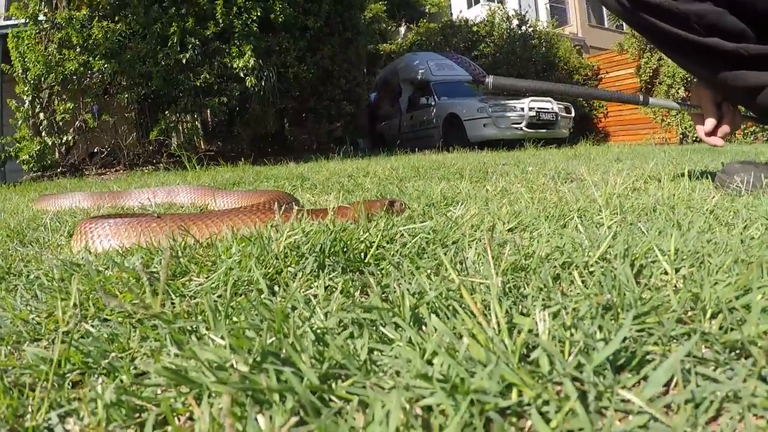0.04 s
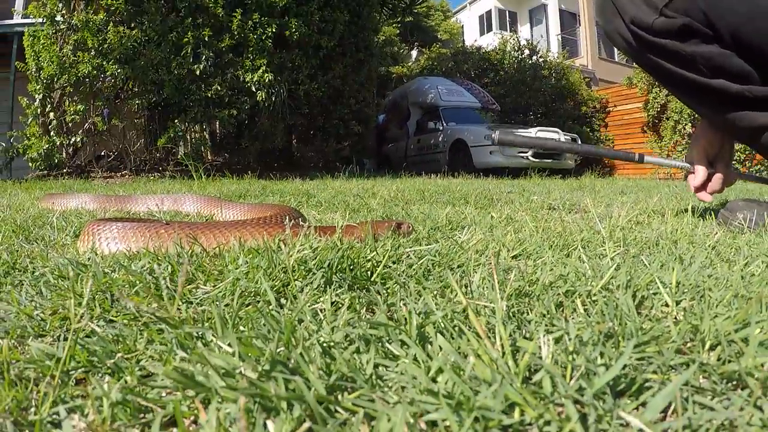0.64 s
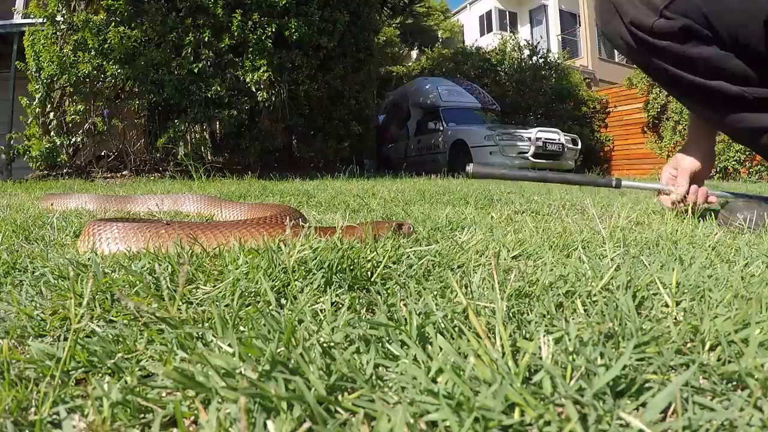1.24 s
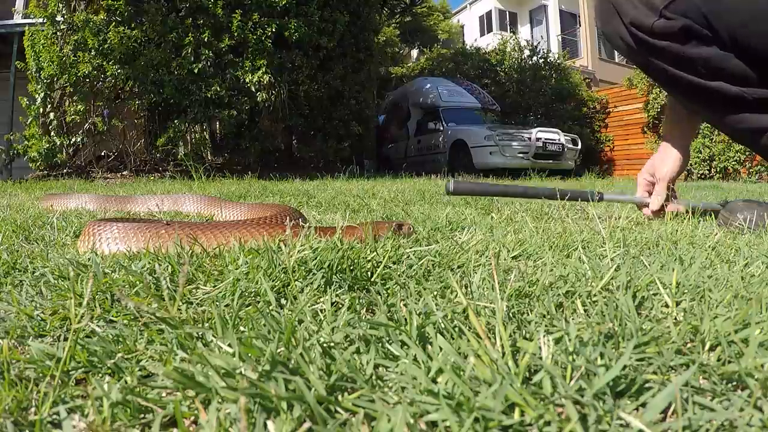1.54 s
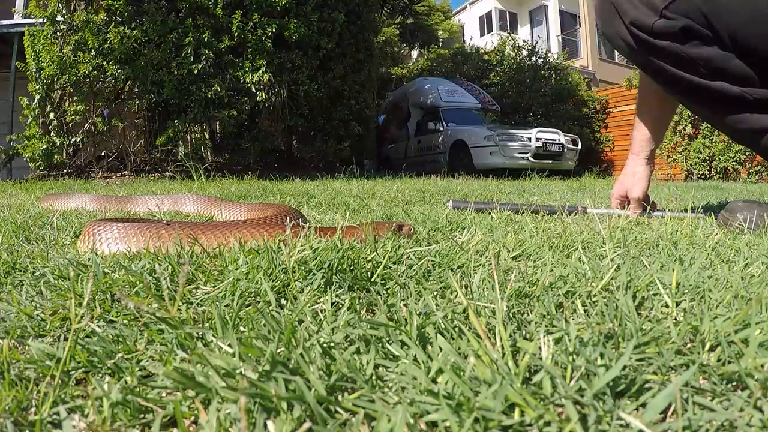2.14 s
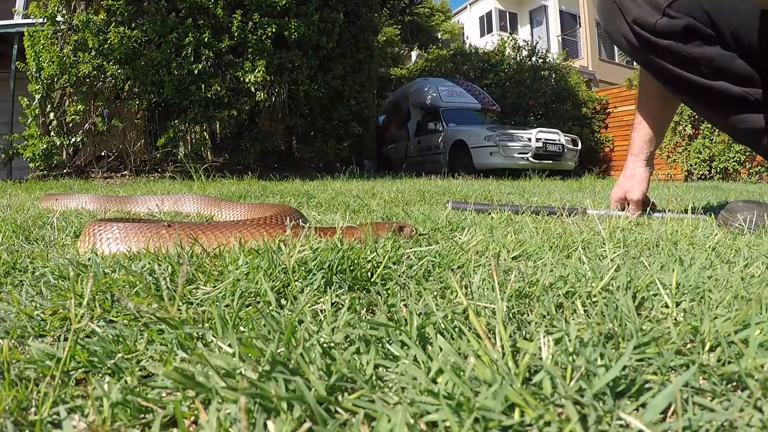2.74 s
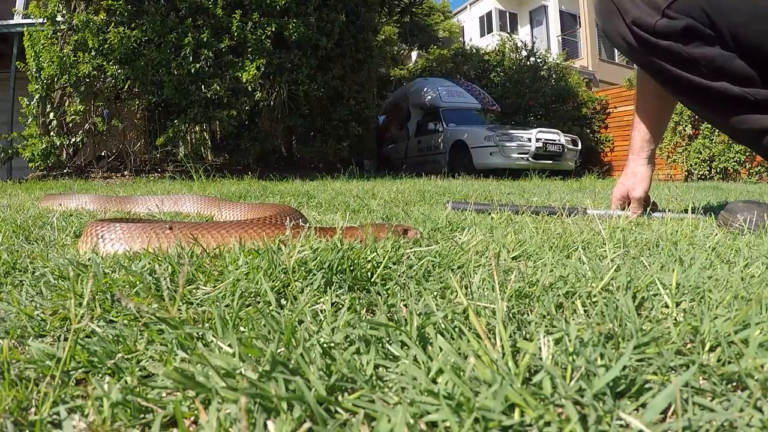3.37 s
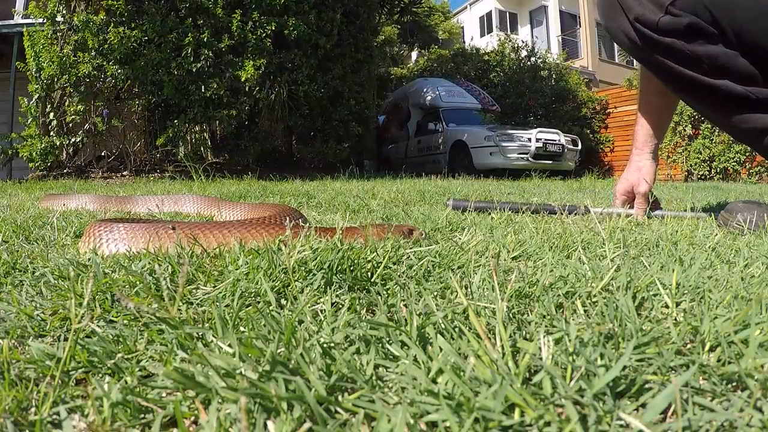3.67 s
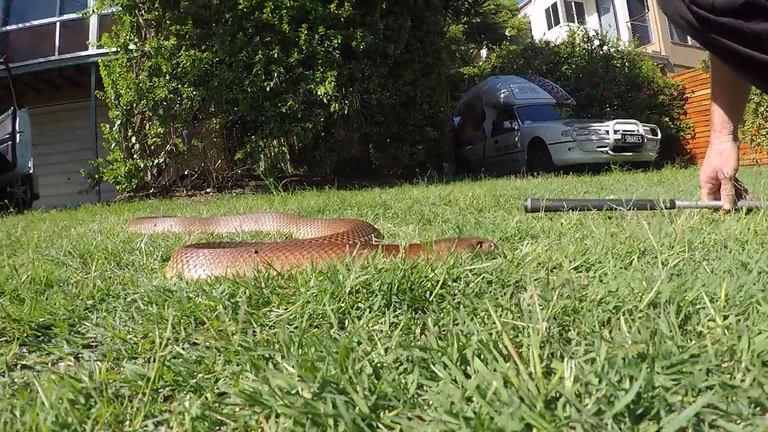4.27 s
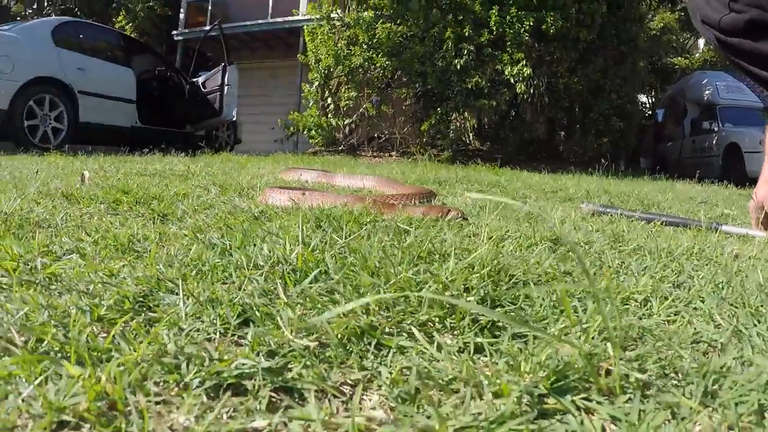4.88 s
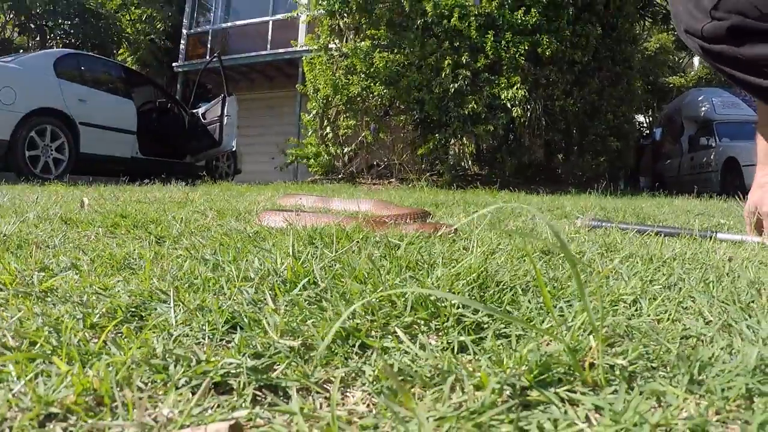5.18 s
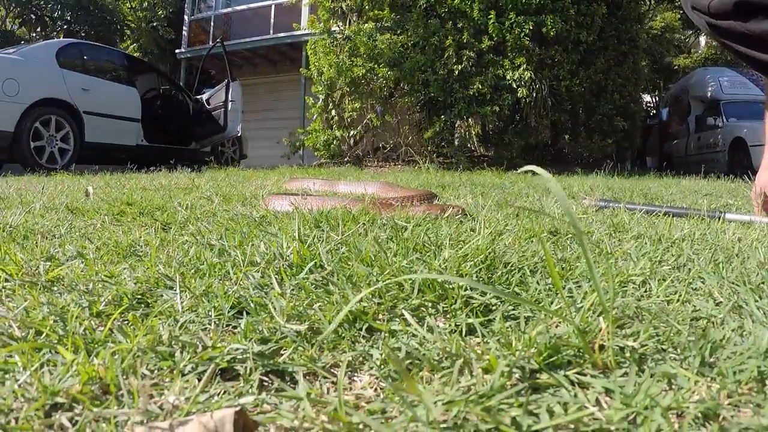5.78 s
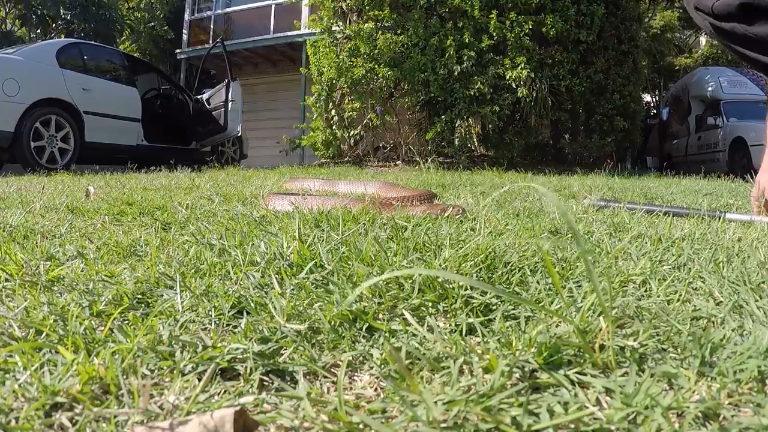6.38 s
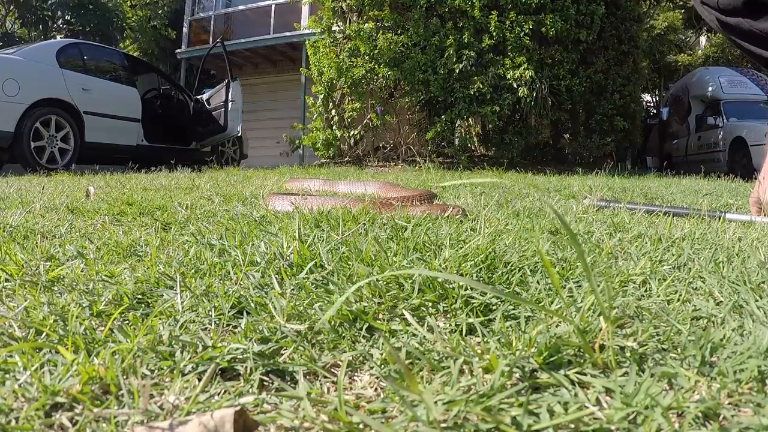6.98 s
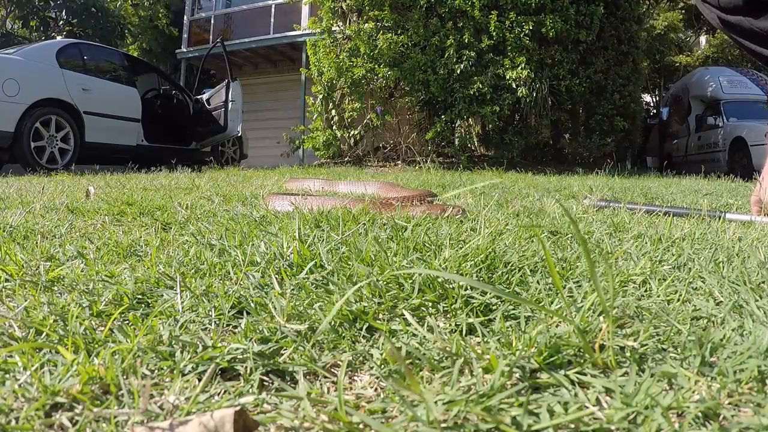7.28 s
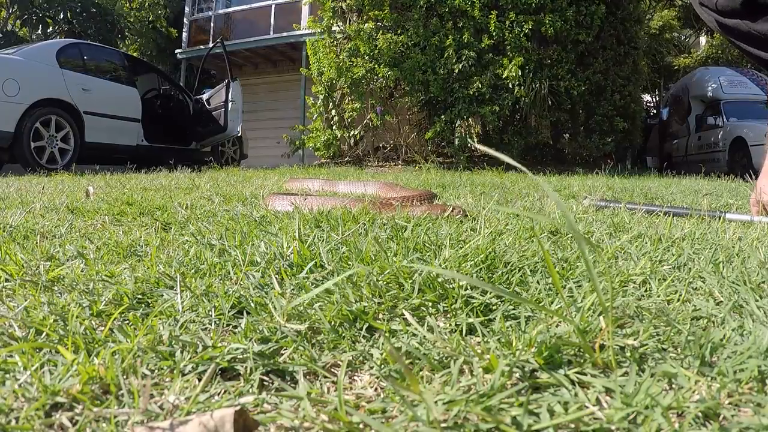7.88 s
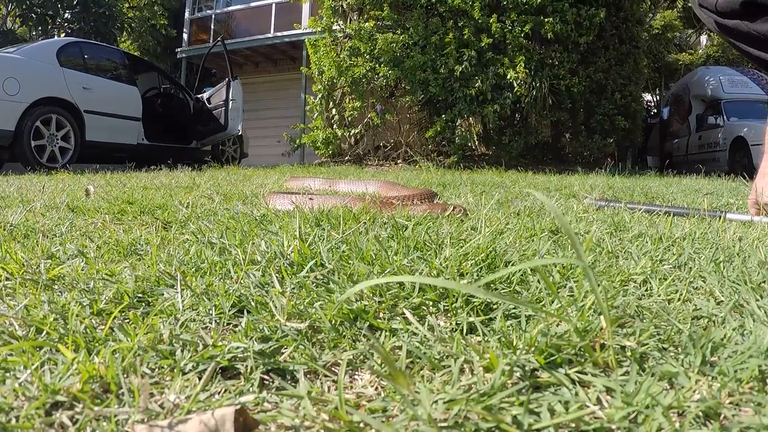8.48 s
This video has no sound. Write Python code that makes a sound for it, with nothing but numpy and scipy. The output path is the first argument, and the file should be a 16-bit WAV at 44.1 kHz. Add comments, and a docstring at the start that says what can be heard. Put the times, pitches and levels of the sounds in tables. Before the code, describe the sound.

For the first half second, fingers rub and slide on a plastic camera case close to the microphone, with a small click. A quiet garden follows: soft hiss, a light low breeze, a distant motor hum, a barely audible high whine and a few faint ticks. A far bird whistles faintly around 3 seconds. At about 3.8 seconds, loud wind hits the microphone with deep rumble and thumps. From 4 to 5.5 seconds, fingers rub, slide and click on the case, some ticks carrying brief metallic pings. The wind roars and thumps hardest around 5.5 seconds, with a faint brush of dry grass, and keeps buffeting until about 7 seconds. After a short lull near 7.5 seconds, strong gusts return from 7.9 seconds to the end at about 8.5, with a few more ticks and light grass brushing.

```python
"""In garden grass, a camera is shifted by hand: fingers rub, slide and tick on its ringing plastic case,
and the ticks carry brief metallic pings. From the moment it is moved, gusts buffet the microphone
with rumble, roar and thumping eddies, and dry blades brush past. Behind it all sit a soft garden hiss,
a distant motor hum, a far bird and a thin, high whine."""
import sys
import numpy as np
from scipy import signal
from scipy.fft import rfft, irfft
from scipy.io import wavfile
from scipy.ndimage import uniform_filter1d, minimum_filter1d

SR = 44100
rng = np.random.default_rng(int(sys.argv[2]) if len(sys.argv) > 2 else 0)


def to_wav(s):
    """Save 16-bit WAV."""
    ch = np.atleast_2d(s).T  # columns
    pcm = np.round(np.clip(ch, -1, 1) * 32767)  # PCM
    wavfile.write(sys.argv[1], SR, pcm.astype(np.int16))


N = 375732
T = np.arange(N) / SR

# Table levels are relative, ahead of each layer's gains. Rise and fall times span 20 dB.
# resonances of the plastic case (frequency [Hz], width [Hz], level [dB])
CASE_MODES = [(341, 65, -12.5), (508, 89, -2.5), (619, 43, 0.5), (700, 63, -2.5), (774.6, 22, 2.5),
              (1010, 910, -15.5), (1275, 97, -6), (1425, 32, -15), (1844, 290, -13.5), (2033, 103, -4),
              (2680, 250, -16.5), (2944, 140, -10.5), (3190, 450, -13), (3440, 65, -11), (3860, 600, -14),
              (4940, 340, -14), (5540, 390, -19), (6300, 420, -20), (7940, 1100, -31.5), (10700, 1800, -38),
              (13500, 1800, -45)]
# rough finger rubs (time at full force [s], hold [s], rise [s], fall [s], level [dB])
FINGER_RUBS = [(0, 0.11, .02, .05, -40), (.125, 0.1, .04, 0.044, -37.5),
               (.28, 0.0069, 0.0087, 0.067, -44.5), (4.085, .043, 0.04, .02, -37.5),
               (4.225, 0.13, .11, 0.1, -33), (4.44, 0.04, 0.024, 0.068, -36.5),
               (4.52, 0.036, .02, 0.027, -48), (4.6, 0.039, 0.023, 0.12, -48),
               (4.703, .022, 0.023, 0.04, -39.5), (4.762, 0.012, 0.019, 0.076, -32.5),
               (4.862, 0.0076, 0.013, 0.061, -34), (5.02, 0.03, 0.13, 0.1, -22.5),
               (5.32, 0.028, .07, 0.046, -33)]
# smooth slides (time at full speed [s], hold [s], rise [s], fall [s], level [dB], sheen lift [dB])
FINGER_SLIDES = [(0, 0.02, .01, 0.06, -32, -2), (0.089, 0.057, .025, 0.019, -33, -1),
                 (4.036, 0.043, .002, 0.043, -31.5, 8), (4.177, 0.043, 0.057, 0.26, -32.5, 1),
                 (5.198, 0.04, 0.031, 0.082, -37.5, -3), (5.255, 0.018, 0.069, 0.06, -39, 7),
                 (5.29, 0.012, .05, 0.031, -31, -7)]
# tone of a slide (frequency [Hz], level [dB])
SLIDE_EQ = [(300, -5), (550, 6.5), (1000, -9.5), (1500, -11), (2000, -6.5), (2350, -13), (2900, -6.5),
            (4000, -5.5), (5500, -9), (6200, -16.5), (7200, -16.5), (8400, -23.5), (12500, -32),
            (15000, -31)]
# snaps and ticks (time [s], level [dB], click and ping lift [dB], click and ping pitch [Hz])
TICK_HITS = [(.195, -35, -2, 3400), (.547, -47, -17, 2780), (.74, -51, -13, 2900), (.893, -48, -8, 3900),
             (.954, -54, -15, 3300), (1.234, -48.5, 0, 4100), (1.46, -53, -6, 4410),
             (2.507, -47.5, -6.5, 3050), (4.077, -40, 7, 4730), (4.088, -27, -8.5, 3730),
             (4.124, -24.5, -12, 3810), (4.258, -36, 4.5, 2880), (4.357, -25, -10, 2840),
             (4.435, -36, 7.5, 2830), (4.465, -39, -2.5, 2970), (4.482, -22, -4, 4610),
             (4.543, -32, -18, 3440), (4.575, -40, -9, 3790), (4.595, -31, -21, 2960),
             (4.699, -33.5, -12, 3620), (4.72, -33.5, -8, 3060), (4.823, -30.5, -10, 2650),
             (4.858, -34, -5, 2850), (4.927, -43.5, 10, 3780), (5.245, -29, -13, 5400),
             (5.421, -40.5, -4.5, 3120), (6.026, -45, -14, 2800), (6.347, -48.5, 6, 3060),
             (7.532, -38.5, -25, 2860), (7.988, -51, 5.5, 2680), (8.023, -40.5, -10, 3320),
             (8.331, -38.5, -2.5, 3020), (8.399, -50, -1, 3100)]
# airflow between gusts: light breeze, windy spell, lull, wind again (time [s], level [dB])
AIRFLOW = [(0, -39.5), (2.3, -40), (3.0, -43), (3.55, -43), (3.78, -15.5), (4.15, -23), (4.7, -20.5),
           (5.45, -21), (5.72, -20), (6.2, -17.5), (6.5, -20.5), (7.0, -22.5), (7.4, -36.5), (7.55, -49),
           (7.72, -35.5), (7.88, -16.5), (8.52, -18.5)]
# gusts swelling over that flow (peak time [s], length [s], level [dB])
GUST_SWELLS = [(0.194, 0.086, -35.5), (0.738, 0.065, -29), (1.028, 0.098, -32.5), (1.955, 0.084, -30.5),
               (2.097, 0.097, -28), (2.413, 0.17, -32.5), (2.591, 0.068, -28), (2.833, 0.039, -34),
               (3.898, 0.027, -7.5), (4.349, 0.089, -16), (4.557, 0.045, -13), (4.775, 0.053, -13),
               (4.903, 0.052, -11), (5.01, 0.11, -15), (5.37, 0.065, -12), (5.477, 0.086, -10),
               (6.056, 0.059, -24), (6.181, 0.052, -8), (6.388, 0.037, -13), (6.595, 0.11, -18),
               (6.79, 0.059, -21), (6.945, 0.036, -19), (7.09, .05, -26.5), (7.766, 0.089, -28),
               (8.002, 0.021, -11), (8.192, 0.051, -12.5), (8.267, 0.072, -10.5), (8.414, 0.05, -11)]
# spells of fast turbulence (time at full speed [s], hold [s], rise [s], fall [s], level [dB])
TURBULENCE = [(3.77, .06, 0.16, .05, -52), (3.87, 0.077, 0.026, .08, -26), (3.955, 0.014, 0.055, .17, -21),
              (5.35, .1, 0.02, 0.11, -29), (5.53, .14, 0.21, 1.0, -20.5), (5.89, 0.12, .2, 0.05, -26.5),
              (6.16, 0.1, 0.022, 0.09, -22.5), (6.38, .33, .05, 0.091, -35.5), (7.08, .01, .03, 0.23, -49),
              (7.922, 0.019, 0.057, 0.21, -23), (8.12, 0.18, 0.3, .1, -33),
              (8.303, 0.0061, 0.048, 0.19, -18.5), (8.42, .008, 0.046, 0.29, -25)]
# eddies landing on the microphone (time [s], thump level [dB], roar burst level [dB])
EDDIES = [(3.851, -17, -21), (3.931, -0.5, -16.5), (4.336, -8, -40), (4.522, -6, -39), (4.771, -15, -19),
          (5.399, -3, -32), (5.464, 1, -9), (5.5, -1, -9), (5.525, -1, -17), (5.609, -26, -12),
          (6.209, -7, -21), (6.275, -18, -19.5), (6.369, -4, -18.5), (6.715, -8.5, -22.5), (7.06, -2, -44),
          (7.622, -12, -33), (7.774, -6, -38), (7.916, -1.5, -12), (7.984, -3, -9.5), (8.247, -12, -20),
          (8.295, -23, -9.5), (8.417, -20, -9)]
# tone of the four wind layers, darkest first (frequency [Hz], level [dB])
RUMBLE_EQ = [(8, -17), (20, 2), (31, 3), (55, -5), (85, -7.5), (130, -21), (300, -89), (700, -82.5)]
BUFFET_EQ = [(40, -2.5), (90, 1.5), (130, 0.5), (200, -4), (280, -11.5), (450, -22), (900, -47.5),
             (2000, -108)]
ROAR_EQ = [(120, 0.5), (280, 3), (400, 0.5), (520, -2.5), (700, -18.5), (1000, -45.5), (1600, -46),
           (3000, -47), (6000, -76), (15000, -66)]
SPUTTER_EQ = [(400, 7), (800, 14), (1300, 2), (2000, -7), (4000, -19.5), (7000, -31), (15000, -47)]
# blades brushing past (time at full level [s], hold [s], rise [s], fall [s], level [dB])
GRASS_BRUSHES = [(3.155, .02, .03, .12, -63), (5.46, 0.055, 0.045, 0.21, -55.5),
                 (7.925, 0.11, 0.045, 0.042, -55.5), (8.25, 0.12, .1, 0.052, -60),
                 (8.415, 0.011, 0.023, 0.069, -54)]
# tone of dry grass (frequency [Hz], level [dB])
GRASS_EQ = [(1200, -8), (2800, -1), (5000, -1), (7500, -6), (15000, -13)]
# tone of the low outdoor wash (frequency [Hz], level [dB])
WASH_EQ = [(29, -25), (50, -1.5), (124, -6.5), (299, -13), (506, -16), (724, -28.5), (1200, -36.5),
           (2070, -45), (2820, -57.5), (4340, -40.5), (7160, -49), (8870, -58.5), (9530, -54.5),
           (12700, -56.5), (15000, -61.5)]
# fader ride on the far hiss of foliage and insects (time [s], level [dB])
FOLIAGE_RIDE = [(0, -63), (5.8, -63), (6.3, -58.5), (6.8, -57), (7.5, -59.5), (8.5, -59)]
# tone of that hiss (frequency [Hz], level [dB])
FOLIAGE_EQ = [(1200, -7), (2200, 1.5), (2800, 7), (3400, 3.5), (4000, 4.5), (5500, -2.5), (7500, -8.5),
              (15000, -14.5)]
# harmonics of the distant motor (frequency [Hz], level [dB])
MOTOR_HARMONICS = [(126.3, -49), (189.5, -59), (253.3, -57.5), (379, -64), (505, -64.5)]
# the far bird's phrase (time [s], length [s], start pitch [Hz], end pitch [Hz], level [dB])
BIRD_NOTES = [(2.883, .04, 4120, 4230, -62), (2.91, 0.032, 4620, 4760, -64), (2.99, .03, 2840, 2810, -64),
              (3.035, .05, 2780, 2490, -64), (3.11, .055, 2830, 3100, -64)]


def case_ring(leak_db=-33, leak_hz=3500, size=4096):
    """Impulse response of the plastic case: its modes over a weak direct path."""
    hz = abs(np.fft.fftfreq(size, 1 / SR))
    modes = sum((amp(db) / (1 + (2 * (hz - f) / width) ** 2)) ** 2 for f, width, db in CASE_MODES)
    leak = amp(leak_db) ** 2 / (1 + (hz / leak_hz) ** 4)
    log_gain = np.log(modes + leak) / 2
    return np.fft.ifft(np.exp(np.conj(signal.hilbert(log_gain)))).real  # minimum phase: no pre-ring


def rubs(ring, body_db=2, treble_db=-10, grit_db=-7, firm_db=-35, catch_db=3, grip_db=1.35):
    """Skin catches and slips, and each tiny slip rings the case. A firmer rub is louder and duller."""
    slips = grains(per_s=4000, spread_db=0) * amp(catch_db * wander(150))
    hard_catches = grains(per_s=160, spread_db=1)
    scrape = steady(signal.oaconvolve(slips, ring)[:N], seconds=0.0087)
    scrape += amp(grit_db) * unit(signal.oaconvolve(hard_catches, ring)[:N])
    top = highs(scrape, hz=4300)
    force = strokes(FINGER_RUBS) * amp(grip_db * wander(60) - firm_db)  # 1 for a firm rub
    body = amp(body_db) * unit(scrape - top) * force
    treble = amp(treble_db) * unit(top) * force ** 0.79
    return amp(firm_db) * (body + treble)


def slides(flutter_db=1.0, sheen_hz=6300):
    """Light slides make grains so fine they merge into hiss; each has its own amount of bright sheen."""
    hiss = colour(grains(per_s=12000, spread_db=3), SLIDE_EQ) * amp(flutter_db * wander(120))
    sheen = highs(hiss, sheen_hz)
    speed = strokes([(*timing, db) for *timing, db, _ in FINGER_SLIDES])
    sheen_gain = strokes([(*timing, db + lift_db) for *timing, db, lift_db in FINGER_SLIDES])
    return (hiss - sheen) * speed + sheen * sheen_gain


def ticks(ring, knock_db=22, click_db=24, ping_db=20, focus_db=12, scuff_t60=0.022, ping_t60=0.059):
    """Snaps and ticks: a low knock and bright click on the case, plus a brief metallic ping."""
    out, t = np.zeros(N), np.arange(len(ring)) / SR
    hz = np.fft.rfftfreq(len(t), 1 / SR) + 1
    low_band = 1 / (1 + (hz / 2450) ** 8)  # crossover between knock and click
    for s, db, bright_db, pitch_hz in TICK_HITS:
        scuff = 0.21 * rng.standard_normal(len(t)) * amp(-60 * t / scuff_t60)
        snap = np.roll(scuff + (t == 0), 32)  # a short lead-in leaves room for the filters
        spectrum = rfft(snap) * rfft(ring)
        off_pitch = np.minimum((2 * np.log2(hz / pitch_hz)) ** 2, 1)
        focus = amp(-focus_db * off_pitch) * np.sqrt(hz / pitch_hz)
        knock = irfft(spectrum * low_band)
        click = irfft(spectrum * (1 - low_band) * focus)
        ping = np.sin(2 * np.pi * pitch_hz * t) * amp(-60 * t / ping_t60)
        add(out, s, amp(db + bright_db + ping_db) * ping / np.linalg.norm(ping))
        add(out, s, amp(db + knock_db) * knock / np.linalg.norm(knock))
        add(out, s, amp(db + bright_db + click_db) * click / np.linalg.norm(click))
    return out


def wind(rumble_db=0.5, buffet_db=-28, churn_db=-4, roar_db=0.5, sputter_db=-44,
         gust_ref_db=-17, speed_ref_db=-22, burst_db=-3, burst_rise_s=0.0029, burst_t60=0.07):
    """Air rumbles, buffets and, at speed, roars and sputters; a faint distortion hiss is laid on top."""
    lumps = steady(amp(2 * wander(90)), seconds=0.023)
    flutter = amp(1.5 * wander(30))
    push = wind_pressure()
    speed = strokes(TURBULENCE) * flutter
    rumble = amp(rumble_db) * steady(noise(RUMBLE_EQ), seconds=0.09) * push
    shake = amp(buffet_db) * (push * flutter / amp(gust_ref_db)) ** 1.36
    buffet = steady(noise(BUFFET_EQ) * lumps, seconds=0.039) * np.hypot(shake, amp(churn_db) * speed)
    t = np.arange(SR // 4) / SR
    for s, _, db in EDDIES:  # the air speeds up abruptly as an eddy lands
        add(speed, s, amp(db + burst_db - 60 * t / burst_t60) * np.minimum(t / burst_rise_s, 1))
    roar = amp(roar_db) * steady(noise(ROAR_EQ) * lumps, seconds=0.021) * speed
    crackle = colour(grains(per_s=1500, spread_db=0), SPUTTER_EQ)
    sputter = amp(sputter_db) * crackle * (speed * lumps / amp(speed_ref_db)) ** 1.83
    return rumble + buffet + roar + sputter + distortion_hiss(rumble + buffet)


def wind_pressure():
    """Strength of the wind: bell-shaped gusts over the underlying flow."""
    gust_power = sum(amp(db) ** 2 * np.exp(-(2 * (T - s) / length) ** 2) for s, length, db in GUST_SWELLS)
    return np.sqrt(ride(AIRFLOW) ** 2 + gust_power)


def distortion_hiss(lows, relative_db=-52):
    """Faint distortion hiss that swells with the loudest low rumbles."""
    return amp(relative_db) * rng.standard_normal(N) * abs(lows)


def thumps(gain_db=-5.5, eddy_hz=54, cycles=0.98, churn=0.43):
    """Each eddy is a push and a pull of pressure with a little churning behind it."""
    out, t = np.zeros(N), np.arange(SR // 8) / SR
    age = t * eddy_hz / cycles
    lowpass = signal.butter(3, 2 * eddy_hz, fs=SR, output="sos")
    for s, db, _ in EDDIES:
        swirl = unit(signal.sosfilt(lowpass, rng.standard_normal(len(t))))
        eddy = age * np.exp(-2 * age) * (np.sin(2 * np.pi * eddy_hz * t) + churn * swirl)
        add(out, s, amp(db + gain_db) * eddy / abs(eddy).max())
    return out


def grass():
    """Dry blades catch on each other in tiny snaps."""
    return colour(grains(per_s=1800, spread_db=4.5), GRASS_EQ) * strokes(GRASS_BRUSHES)


def garden(wash_db=-45.5):
    """The ambience bed: a low outdoor wash under the far hiss of foliage and insects."""
    return amp(wash_db) * noise(WASH_EQ) + noise(FOLIAGE_EQ) * ride(FOLIAGE_RIDE)


def motor(waver_rad=0.15):
    """A distant motor hums, each harmonic wavering slightly in phase."""
    return sum(amp(db) * np.sqrt(2) * np.sin(2 * np.pi * hz * T + waver_rad * wander(8.2))
               for hz, db in MOTOR_HARMONICS)


def bird(gain_db=-1, flicker_db=7):
    """A far bird's gliding whistles flicker on their way through the air."""
    out = np.zeros(N)
    for s, length, start_hz, end_hz, db in BIRD_NOTES:
        progress = np.arange(0, length, 1 / SR) / length
        turns = np.cumsum(start_hz + (end_hz - start_hz) * progress) / SR
        add(out, s, amp(db) * np.sin(np.pi * progress) * np.sin(2 * np.pi * turns))
    return out * amp(gain_db + flicker_db * wander(70))


def whine(db=-78, pitch_hz=8631, throb_hz=29.5):
    """A thin, high whine that throbs evenly."""
    return amp(db) * (1 + np.cos(2 * np.pi * throb_hz * T)) * np.sin(2 * np.pi * pitch_hz * T)


def amp(db):
    """Decibels to gain."""
    return 10 ** (np.asarray(db) / 20)


def unit(x):
    """Scales to rms 1."""
    return x / np.sqrt(np.mean(x ** 2) + 1e-20)


def colour(x, eq):
    """Shapes x with an EQ curve of (frequency [Hz], level [dB]) points; rms 1."""
    f, db = np.transpose(eq)
    hz = np.fft.rfftfreq(N, 1 / SR)
    gain = amp(np.interp(np.log(hz + 1), np.log(f), db))
    return unit(irfft(rfft(x) * gain, N))


def noise(eq):
    """White noise through an EQ curve."""
    return colour(rng.standard_normal(N), eq)


def highs(x, hz):
    """The part of x above hz."""
    return signal.sosfiltfilt(signal.butter(3, hz, "high", fs=SR, output="sos"), x)


def grains(per_s, spread_db):
    """Random clicks of uneven size."""
    sizes = rng.standard_normal(N) * amp(spread_db * np.minimum(rng.exponential(1, N), 4))
    return unit(sizes * (rng.random(N) < per_s / SR))


def wander(per_s):
    """Random modulator of rms 1, gliding to per_s new values a second."""
    return unit(np.interp(T * per_s, np.arange(N // 16), rng.standard_normal(N // 16)))


def steady(x, seconds):
    """Levels out swells slower than the given time."""
    size = max(int(seconds * SR), 2)
    power = uniform_filter1d(uniform_filter1d(x ** 2, size), size)
    return x / np.sqrt(abs(power) + 1e-9)


def ride(points):
    """Fader gain through (time [s], level [dB]) points."""
    return amp(np.interp(T, *np.transpose(points)))


def stroke(s, hold, rise, fall):
    """Envelope that reaches 1 at time s, holds and dies away, moving 20 dB per rise or fall time."""
    away = np.maximum((s - T) / abs(rise), 0) + np.maximum((T - s - hold) / abs(fall), 0)
    return amp(-20 * np.minimum(away, 10))


def strokes(rows):
    """Joint envelope of overlapping strokes: their powers add."""
    return np.sqrt(sum((amp(db) * stroke(*timing)) ** 2 for *timing, db in rows))


def add(mix, s, sound):
    """Drops a sound into the mix at time s."""
    part = mix[max(round(s * SR), 0):][:len(sound)]
    part += sound[:len(part)]


def scene():
    """Mono mix: handling, grass and wind up close, the garden behind."""
    ring = case_ring()
    close = rubs(ring) + slides() + ticks(ring) + grass() + wind() + thumps()
    return (close + garden() + motor() + bird() + whine())[None]


def record(dry, ceiling=0.92, cutoff_hz=15350):
    """A smooth limiter holds the largest swings, then a steep low-pass trims the top."""
    needed_gain = np.minimum(1, ceiling / (abs(dry) + 1e-9))
    held_gain = minimum_filter1d(needed_gain, size=800)
    gain = uniform_filter1d(uniform_filter1d(held_gain, size=400), size=400)
    lowpass = signal.firwin(511, cutoff_hz, window=("kaiser", 9), fs=SR)
    return signal.oaconvolve(dry * gain, lowpass[None], "same")


dry = scene()
out = record(dry)
to_wav(out)
```